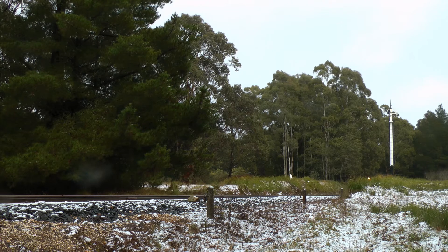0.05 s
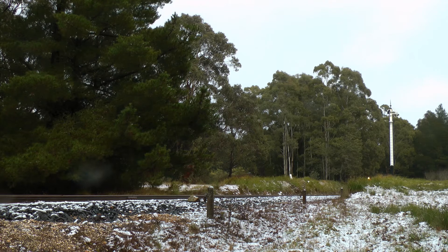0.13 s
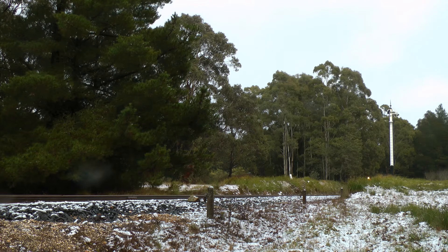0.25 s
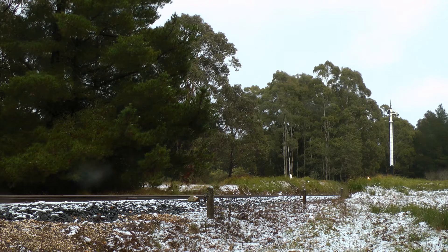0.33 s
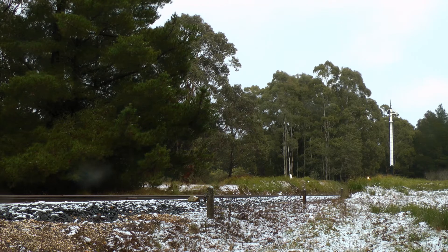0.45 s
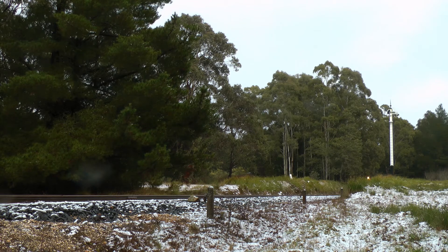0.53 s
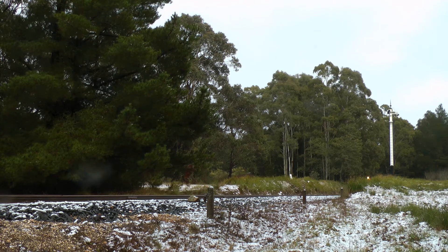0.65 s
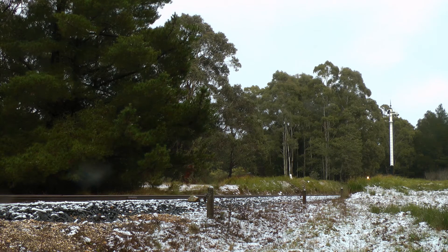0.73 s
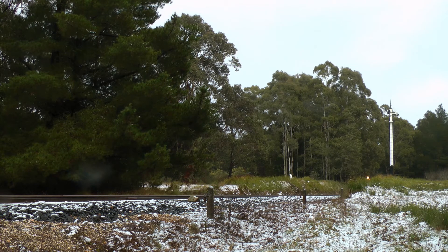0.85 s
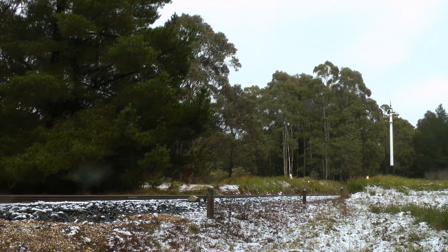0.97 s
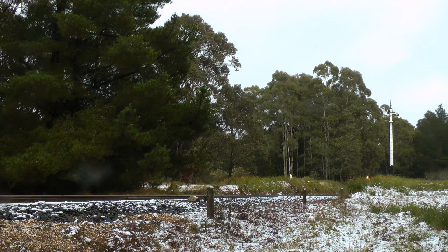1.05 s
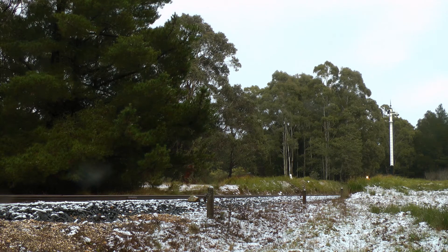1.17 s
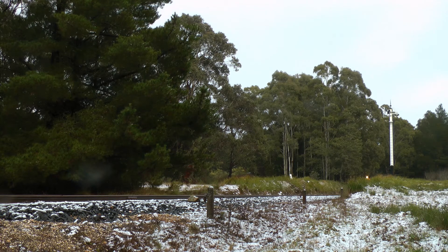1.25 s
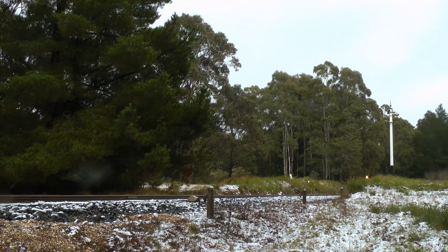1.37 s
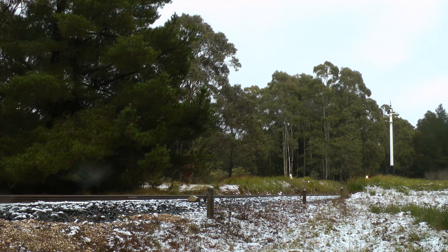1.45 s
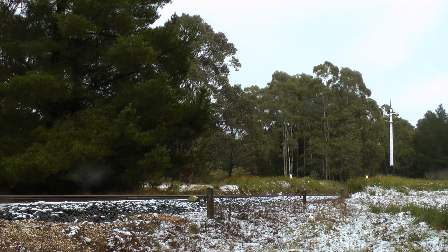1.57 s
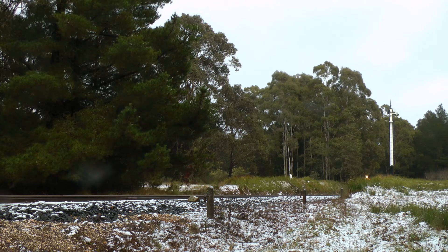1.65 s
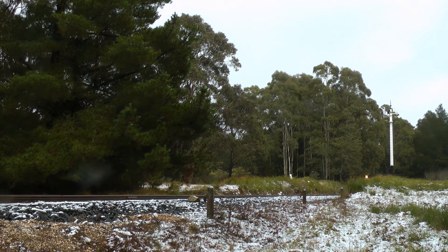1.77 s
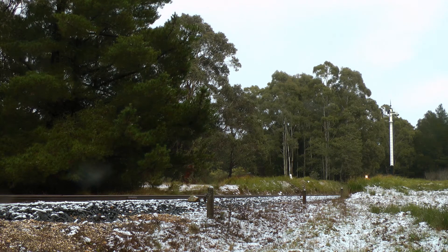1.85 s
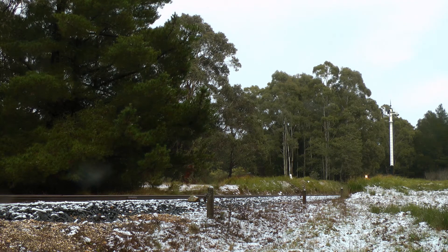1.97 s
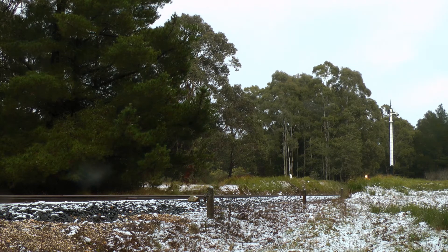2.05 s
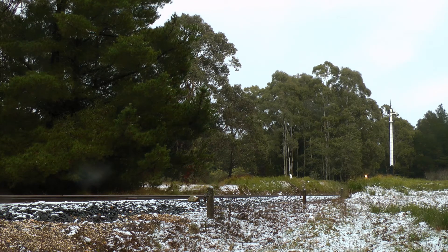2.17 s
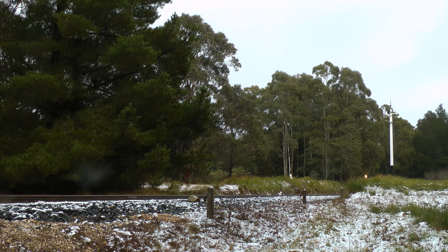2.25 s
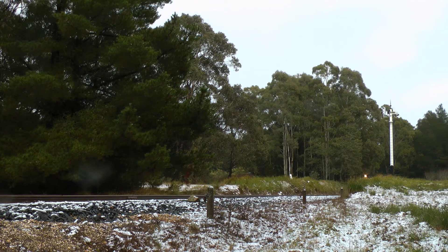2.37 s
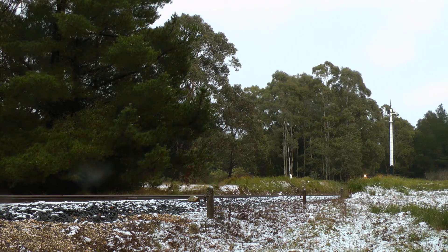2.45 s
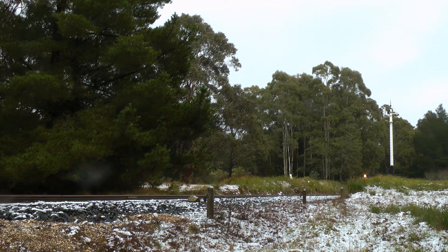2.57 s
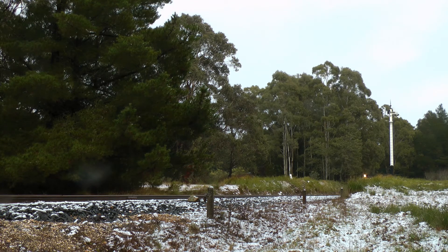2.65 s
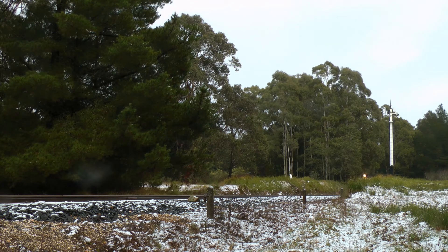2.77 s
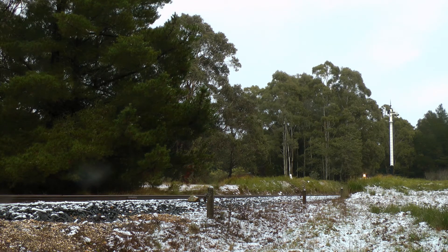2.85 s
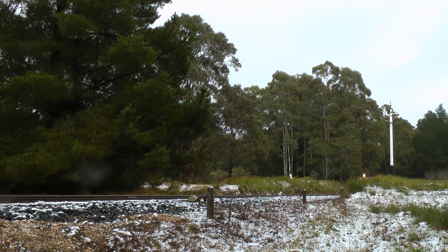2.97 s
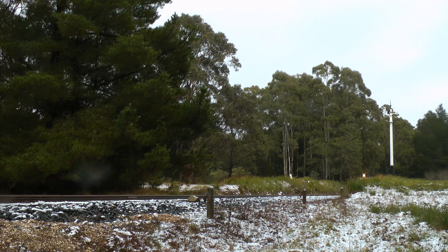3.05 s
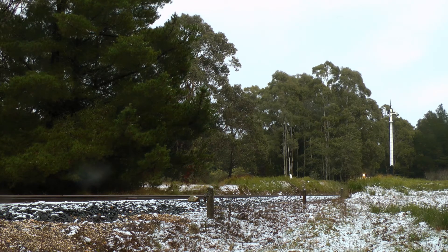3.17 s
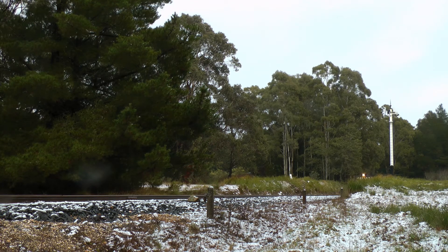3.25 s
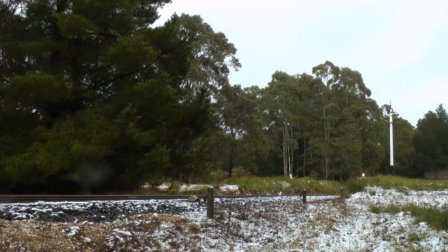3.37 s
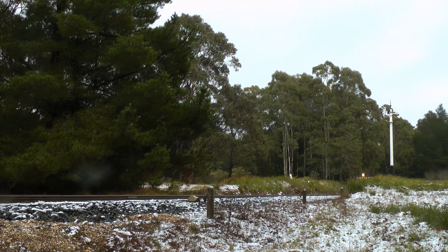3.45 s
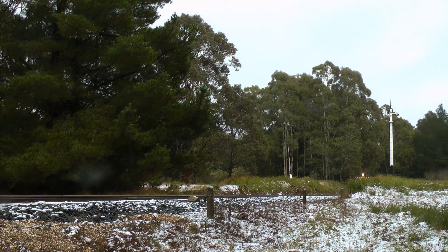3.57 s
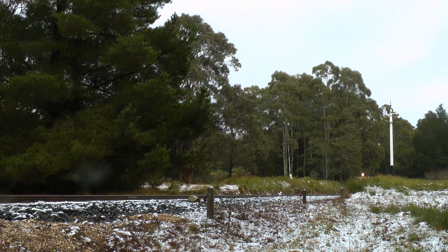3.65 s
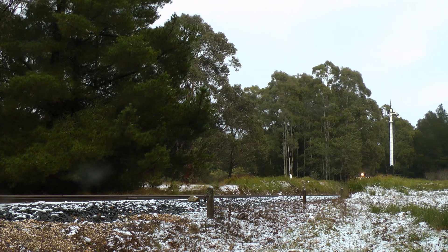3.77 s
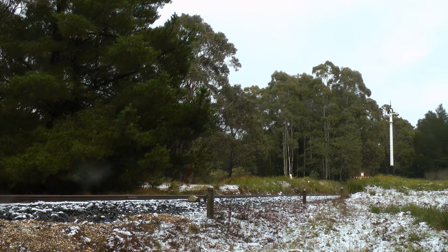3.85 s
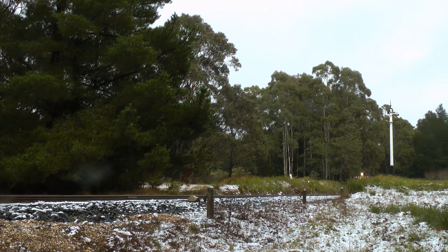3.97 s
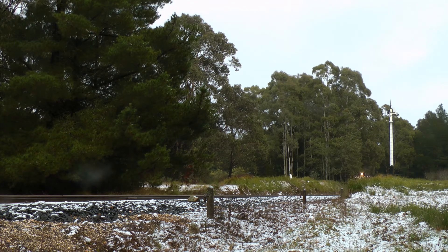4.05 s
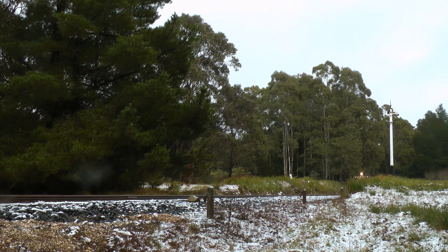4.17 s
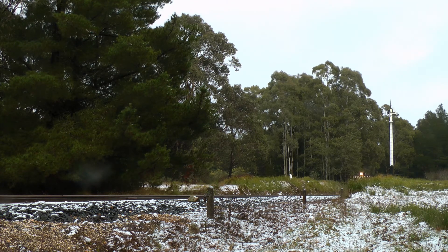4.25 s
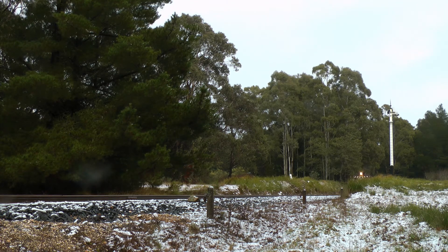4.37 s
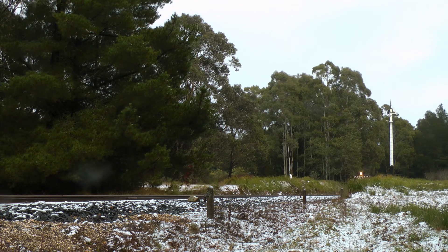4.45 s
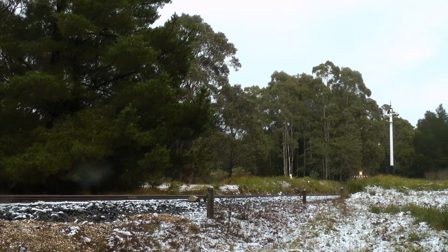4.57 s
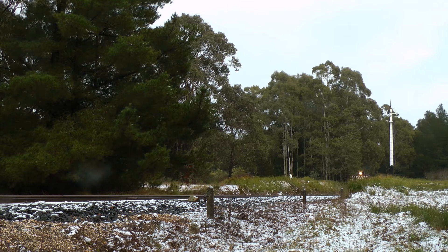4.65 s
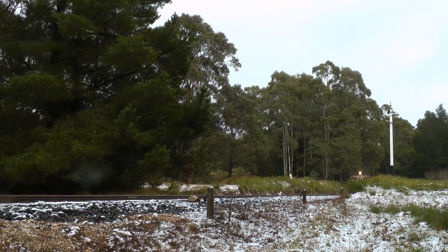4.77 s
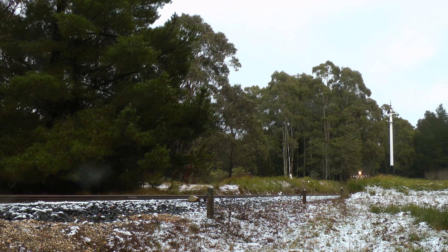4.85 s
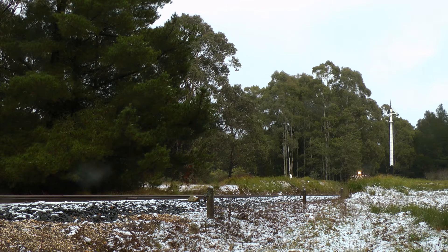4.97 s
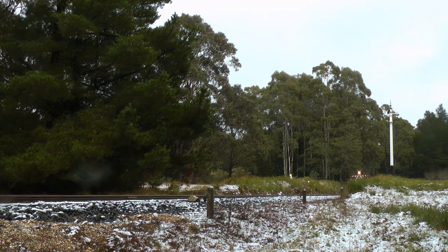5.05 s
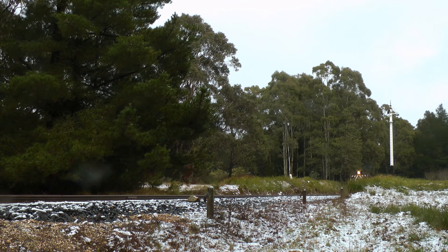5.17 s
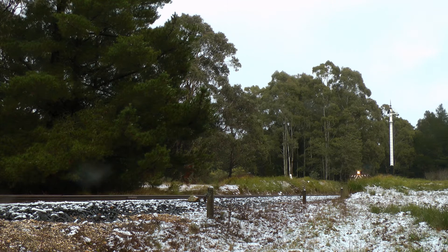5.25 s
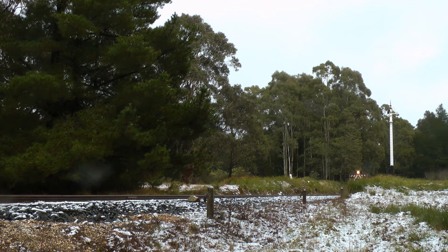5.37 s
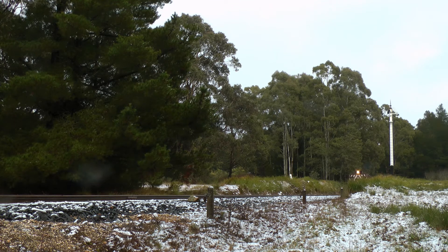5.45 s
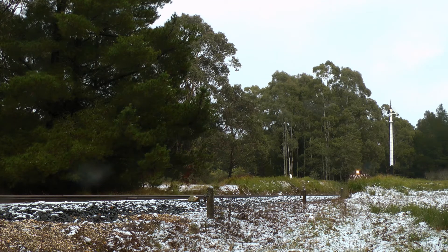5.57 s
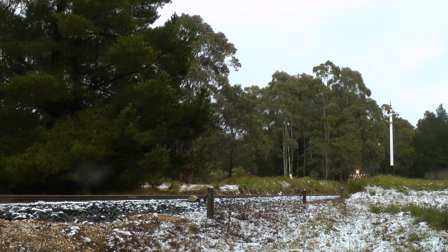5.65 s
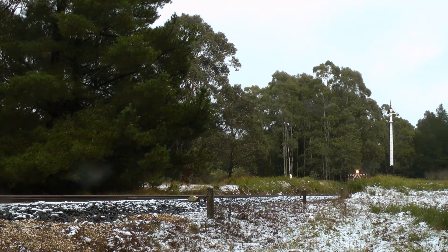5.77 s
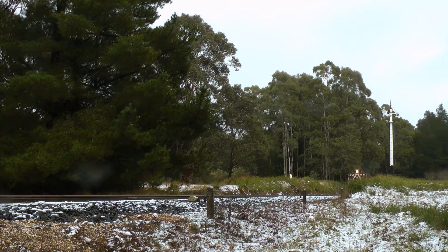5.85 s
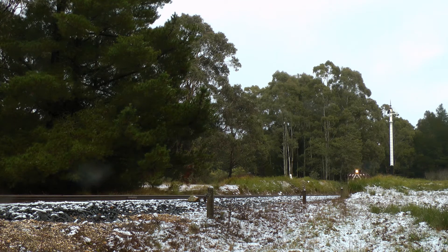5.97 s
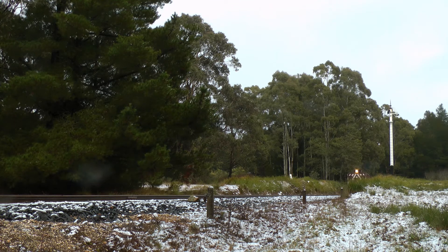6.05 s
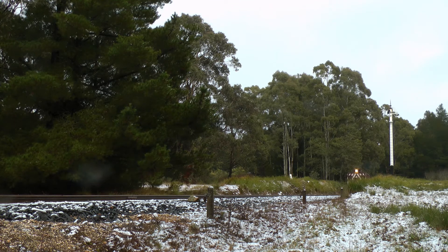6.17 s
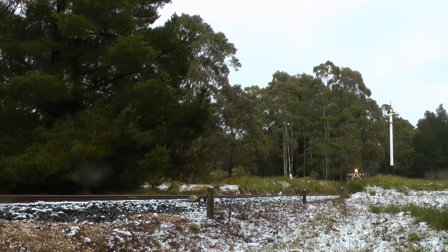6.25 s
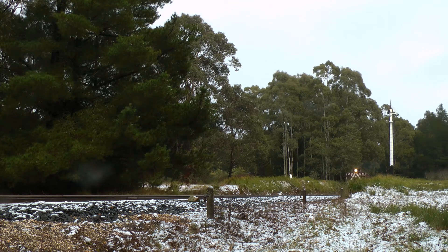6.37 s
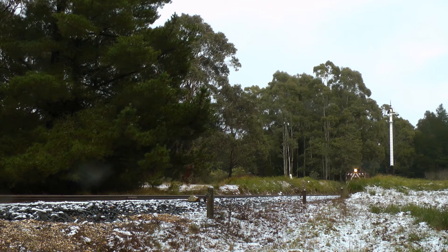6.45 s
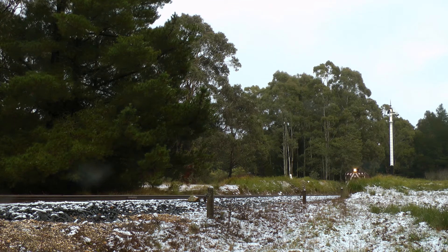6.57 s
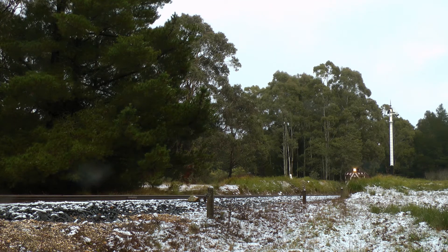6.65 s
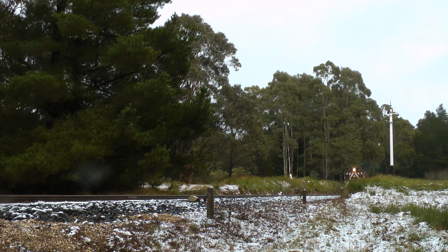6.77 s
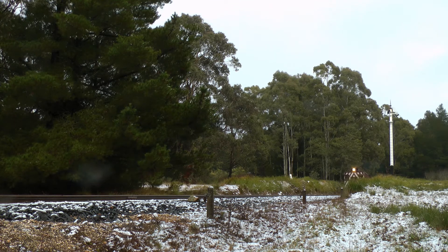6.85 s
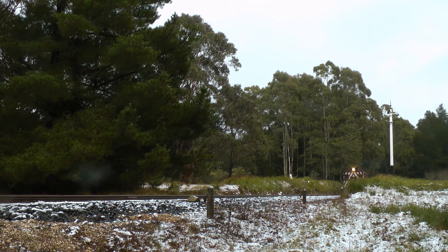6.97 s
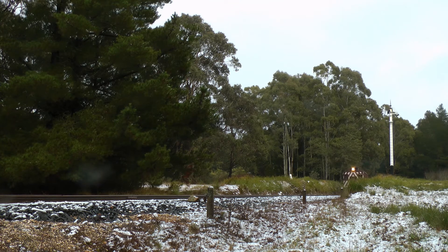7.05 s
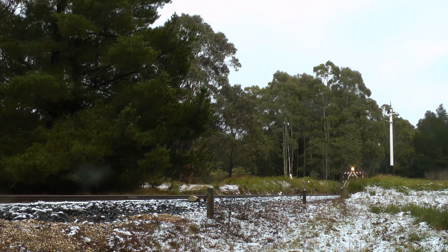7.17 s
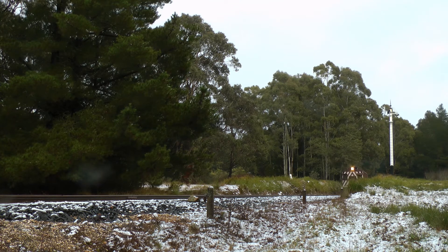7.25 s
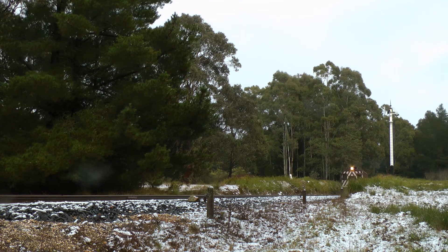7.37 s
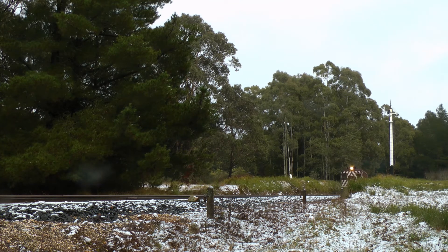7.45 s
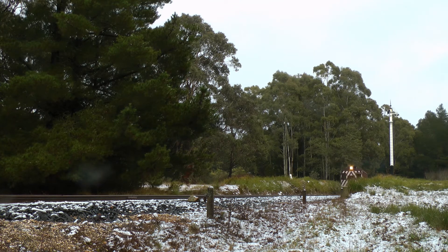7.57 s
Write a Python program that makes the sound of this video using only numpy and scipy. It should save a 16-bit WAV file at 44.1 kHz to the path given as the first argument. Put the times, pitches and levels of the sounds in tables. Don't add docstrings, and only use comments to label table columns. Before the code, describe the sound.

A distant diesel railcar is already audible at 0 s, approaching a fixed microphone across open ground. A steady low drone near 130 Hz leads, at nearly constant revs, rising quickly in the first second and then gradually to its fullest around 6.6 s, easing very slightly at the end. A weaker second drone, just lower, makes it waver and beat. Exhaust throb, hollow bark and dull block knocks surge in uneven gusts, clearer after about 3 s as the trees thin and strongest near 6-7.6 s. Beneath are a faint, slowly rising gear hum, rolling rumble and mid-range wheel and gas roar; above, soft fan hiss drifts, brighter around 2-3 s and at the end. Small thuds or clacks mark rail joints near 0.4, 2, 2.3, 4.6, 5.4, 6.3 and 7.1 s. Everything comes from one distant mono point, and the car has not passed by 7.6 s.

```python
import sys
import numpy as np
from scipy import signal
from scipy.fft import rfft, irfft, next_fast_len
from scipy.io import wavfile
from scipy.ndimage import uniform_filter1d, map_coordinates

SR = 44100
rng = np.random.default_rng(int(sys.argv[2]) if len(sys.argv) > 2 else 0)


def unload_audio(sound):
    columns = np.transpose(np.atleast_2d(sound))
    steps = np.round(np.clip(columns, -1, 1) * 32767)
    wavfile.write(sys.argv[1], SR, steps.astype(np.int16))


def level_to_linear(level):
    exponent = np.asarray(level, float) / 20
    return 10 ** exponent


N = 335601
T = np.arange(N) / SR

# time in seconds, level in dB.
DRONE_LEVEL = [(0, -26.5), (.6, -24), (1.2, -23), (1.8, -22.5), (2.4, -22), (3, -21.5), (3.6, -20.5),
               (4.2, -20.5), (4.8, -19), (5.4, -19), (6, -19), (6.6, -18), (7.2, -18.5), (7.61, -20)]
# time in seconds, lift in dB.
AIR_CARRY = [(0, -1.5), (1.1, -0.5), (2.3, 2), (3, 1.5), (4.1, 0.2), (4.6, -1.5), (5.3, -1.5), (5.85, 0.2),
             (6.2, -1.5), (7.1, 0.5), (7.61, 2)]


def unit(x):
    return x / np.sqrt(np.mean(x ** 2) + 1e-20)


def curves(rows):
    s, *cols = np.transpose(rows)
    return [np.interp(T, s, c) for c in cols]


def swells(rows, length=None):
    rows = np.array(rows, float)
    if length is None:
        width, lifts = np.abs(rows[:, 1]) + .01, rows[:, 2:].T
    else:
        width, lifts = np.full(len(rows), length + .01), rows[:, 1:].T
    coarse = np.arange(0, N + 64, 64) / SR
    bells = np.exp(-((coarse - rows[:, :1]) / width[:, None]) ** 2)
    return [np.interp(T, coarse, lift @ bells) for lift in lifts]


def wobble(rate):
    coarse = np.arange(0, N + 64, 64) / SR
    knots = rng.standard_normal(int(N * rate / SR) + 4)
    return np.interp(T, coarse, map_coordinates(knots, [coarse * rate]))


def nearing(mid_db, gain):
    drone_mid_db = -21
    return mid_db + gain * (curves(DRONE_LEVEL)[0] - drone_mid_db)


def clear_of_trees():
    return np.clip((T - 2.5) / 3.2, 0, 1)


def filtered(x, response):
    m = next_fast_len(N + SR // 2)
    return irfft(rfft(x, m) * response(np.fft.rfftfreq(m, 1 / SR)), m)[:N]


def patchy(x, depth_db, bins, frames):
    z = signal.stft(x, nperseg=1024)[2]
    field = uniform_filter1d(rng.standard_normal(z.shape), max(1, int(bins)), axis=0)
    field = uniform_filter1d(field, max(1, int(frames)), axis=1)
    return unit(signal.istft(z * level_to_linear(depth_db * unit(field)), nperseg=1024)[1][:N])


def noise(spectrum):
    f, db = np.transpose(spectrum)
    gain = lambda hz: level_to_linear(np.interp(np.log(hz + 1), np.log(f), db, left=-120, right=-120))
    return unit(filtered(rng.standard_normal(N), gain))


def modes(table):
    one = lambda f, c, w: 1j * f * w / (c * c - f * f + 1j * f * w)
    return lambda f: sum((-1) ** k * level_to_linear(db) * one(f, c, w) ** 2 for k, (c, w, db) in enumerate(table))


def echoed(f):
    # delay in seconds, level in dB.
    echoes = [
        (.0037, -13),
        (.00836, -8),
        (.0152, -14),
    ]
    return 1 + sum(level_to_linear(db) * np.exp(-2j * np.pi * f * s) for s, db in echoes)


def firings(turns, sizes_db, scatter_db, lope):
    # time in seconds, length in seconds, odd over even turns in dB.
    lopes = [
        (5.7, .3, 4),
    ]
    count = np.floor(6 * turns).astype(int)
    at = np.flatnonzero(np.diff(count)) + 1
    k = count[at]
    odd = (k // 6 % 2 - .5) * swells(lopes)[0][at]
    x = np.zeros(N)
    x[at] = level_to_linear(np.array(sizes_db)[k % 6] + lope * odd + scatter_db * rng.standard_normal(len(k)))
    return x


def firing_drone(turns):
    # multiple of the turn rate, dB under the drone, sign.
    low_orders = [(2, -45.5, 1), (3, -26.5, -1), (4, -29, 1), (5, -23, -1), (7, -17, -1), (8, -27, 1),
                  (9, -21, 1), (10, -42, 1), (12, -42.5, -1), (13, -45.5, -1)]
    angle, near = 2 * np.pi * turns, clear_of_trees()
    low = level_to_linear(.4 * wobble(6)) * np.cos(6 * angle)
    for k, db, sign in low_orders:
        level_db = db + 1.6 * wobble(3) + 6 * (k > 11) * near
        low += sign * level_to_linear(level_db) * np.cos(k * angle + .3 * wobble(3))
    return np.sqrt(2) * level_to_linear(curves(DRONE_LEVEL)[0]) * low


def silencer(turns):
    # multiple of the turn rate, level in dB.
    throb_orders = [(16, -27.5), (17, -21.5), (18, -15.5), (19, -19.5), (20, -4.5), (21, 1.5), (23, -23.5),
                    (24, -20)]
    # time in seconds, length in seconds, throb lift in dB, top order lift in dB.
    gusts = [(0, 0.46, 10, 13.5), (.44, 0.082, -2.5, 8.5), (.7, .15, 1, -2), (.95, 0.29, 6, 10),
             (1.5, 0.19, 4, 3), (1.91, 0.095, 9.5, 5), (2.56, .2, 6.5, -4.5), (2.96, 0.26, 4.5, -5),
             (4.15, .2, 2, 7.5), (4.55, .15, 8.5, 1), (4.96, 0.25, 2.5, 11.5), (5.32, 0.17, 4, 5),
             (5.75, .25, 5, 8), (6.4, .3, 10.5, 6), (7, 0.42, 12, 12), (7.61, 0.33, 12, 13)]
    angle = 2 * np.pi * turns
    drift = 1.3 - 1.1 * clear_of_trees() ** 2

    def lag(k):
        fixed_lag = .2 + .7 * (k % 2) - 1.3 * (k < 19.5) + 1.5 * (int(k == 23) - int(k == 19))
        return fixed_lag + drift * wobble(2)

    throb = sum(level_to_linear(db + 1.2 * wobble(2.1)) * np.cos(k * angle - lag(k)) for k, db in throb_orders)
    top = np.sqrt(2) * np.cos(22 * angle - lag(22))
    throb_lift, top_lift = swells(gusts)
    throb_db = nearing(-40, .6) + throb_lift - 1.4
    top_db = nearing(-45.5, 2) + top_lift + 0.8
    return level_to_linear(throb_db) * unit(throb) + level_to_linear(top_db) * top


def pipe_and_block(turns):
    # centre in Hz, width in Hz, level in dB.
    pipe = [(955, 32, -1), (1002, 30, 0), (1085, 34, -9), (1135, 34, -7), (1200, 30, -10), (1265, 45, -9)]
    low_pipe = [(674, 50, 0), (725, 40, -10), (848, 34, 0)]
    block = [(1590, 130, 0), (1810, 160, -4), (2120, 170, -7)]
    bark_cylinders = [0, -28, -20, -8, -15, -22]
    knock_cylinders = [0, -20, -14, -10, -22, -14]
    # time in seconds, length in seconds, lifts of bark, low bark and knock in dB.
    gusts = [(.2, .08, 1, 5, 6), (.45, .12, 10, 7.5, 8.5), (.83, 0.097, -5.5, 6, 3), (1.29, .1, 5.5, 1, 3),
             (1.48, .08, -6, 10.5, 4), (1.9, .45, 4.5, -4, -3), (2.6, 0.34, 2, 4, 4),
             (3.25, .1, 5.5, 7.5, -2.5), (3.45, .2, 11, 1.5, 2.5), (4.1, 0.37, -6, 5, -1),
             (4.95, 0.29, 7, -1.5, 0.5), (5.19, .07, 5.5, 1, 0.5), (5.42, .12, 9, 3.5, 4.5),
             (5.9, 0.28, 10, 4.5, 8), (6.3, 0.17, 7.5, 3.5, 2), (6.8, 0.36, 7.5, -6.5, 2),
             (7.3, .2, 11.5, 2.5, 0.5), (7.61, 0.23, 12, 7.5, 6.5)]
    near = clear_of_trees()
    blows = filtered(firings(turns + .14, bark_cylinders, scatter_db=1, lope=.2), echoed)
    strikes = firings(turns + .06, knock_cylinders, scatter_db=1.3, lope=.6)
    bark = patchy(filtered(blows, modes(pipe)), depth_db=2, bins=1, frames=50)
    low_bark = patchy(filtered(blows, modes(low_pipe)), depth_db=2.5, bins=1, frames=40)
    knock = patchy(filtered(strikes, modes(block)), depth_db=2, bins=6, frames=20)
    bark_lift, low_bark_lift, knock_lift = swells(gusts)
    bark_db = nearing(-45, 0.48) + bark_lift - 2.4 + 1.0 * near
    low_bark_db = nearing(-40.5, .2) + low_bark_lift - 7.0 + 5.3 * near
    knock_db = nearing(-42, .6) + knock_lift - 11.5 + 5.5 * near
    return level_to_linear(bark_db) * bark + level_to_linear(low_bark_db) * low_bark + level_to_linear(knock_db) * knock


def second_drone(turns):
    # time in seconds, cycles behind.
    slip = [(0, -.5), (.34, 1), (.7, 2), (1.53, 5), (1.76, 6), (2.36, 9), (2.61, 10), (2.83, 11),
            (3.18, 13), (3.59, 15), (4.43, 20), (5.52, 26), (5.91, 28), (6.14, 29), (6.55, 31), (7.26, 35),
            (7.4, 36), (7.61, 37.1)]
    # time in seconds, lift in dB.
    come_through = [(.12, 9), (.36, 5), (.68, 5), (.99, 18), (1.27, 7), (1.52, 7.5), (1.75, 13),
                    (2.22, 6.5), (2.6, 19), (2.83, 15), (3.15, 5), (3.4, 15), (3.95, 2.5), (4.62, 4.5),
                    (5.15, 12), (5.52, 14.5), (5.75, 9), (6.1, 11), (6.6, 5), (6.92, 14)]
    level_db = -47 + swells(come_through, length=0.14)[0]
    return -np.sqrt(2) * level_to_linear(level_db) * np.cos(2 * np.pi * (6 * turns - curves(slip)[0]))


def gears():
    # pitch at the start in Hz, rise in Hz a second, level in dB.
    meshes = [
        (176.4, 1.55, -37.5),
        (158.7, 1.7, -45.5),
    ]
    # pitch in Hz, level in dB, time the fade starts in seconds.
    body_panels = [
        (375.7, -50, 4.6),
        (424, -49, 4),
        (388.5, -50, 11),
    ]

    def hum(hz, level_db, sway):
        phase = 2 * np.pi * np.cumsum(hz) / SR + sway * wobble(4)
        return level_to_linear(level_db + 3.6 * wobble(3.3)) * np.sin(phase)

    total = np.zeros(N)
    for hz, db, end in body_panels:
        fade_db = 12 * np.clip(T - end, 0, 2)
        total += hum(hz + 0 * T, db + 1.0 - fade_db, sway=0.94)
    for hz, rise, db in meshes:
        total += hum(hz + rise * T, db, sway=0.4)
    return total


def rolling(turns):
    # frequency in Hz, level in dB.
    ground_colour = [(12, -34), (26, -16), (40, -2.5), (55, -3), (70, -21)]
    rumble_colour = [(45, -31), (60, -5.5), (75, -2.5), (95, -1.5), (120, 0), (150, -2), (190, -4.5),
                     (215, -20), (240, -43)]
    roar_colour = [(170, -32), (215, -10), (300, -16.5), (400, -5), (455, 2.5), (500, -10), (600, -9),
                   (670, -5), (760, -6.5), (840, -1), (900, -5.5), (980, -1), (1350, -13.5), (1700, -36)]
    clank_colour = [(760, -34), (1300, 3), (2300, -2), (2600, -13.5), (3380, -38.5), (5720, -120)]
    # time in seconds, ground lift in dB, rumble lift in dB.
    jolts = [(0, 9, 11), (.43, 5, 13), (.7, -2, 7.5), (2.35, 3.5, 3.3), (2.82, 6.5, 3), (3.4, 7.5, 5),
             (3.66, 9, 14), (3.95, 15, 9.5), (4.16, 4, 13), (4.37, 7.5, 6.5), (4.68, 7, 10.5),
             (4.95, 3, 10.5), (5.28, 2, 4.5), (5.53, 3, 4), (5.87, 0, 7.5), (6.19, 1.5, 6), (6.45, -5, 7.5),
             (6.77, 1, 9), (7.05, 3, 7), (7.3, 0.1, 5), (7.55, 6, 5)]
    # time in seconds, length in seconds, lift in dB.
    roar_swells = [
        (4.1, .1, -2),
        (4.98, .1, 0),
        (6.8, 0.22, -2.5),
        (7.45, 0.31, 4.5),
    ]
    ground_lift, rumble_lift = swells(jolts, length=.1)
    ground_db = nearing(-56, .1) + ground_lift - 1.0
    rumble_db = nearing(-48, 0.66) + rumble_lift + 5.0
    roar_db = nearing(-39, .7) + swells(roar_swells)[0] + 6.0 - 2.3 * np.clip((T - 3.5) / 2, 0, 1)
    clank_db = nearing(-39.5, .15) + 0.76 * curves(AIR_CARRY)[0] + 0.5
    puff = np.cos(2 * np.pi * turns)
    rumble = patchy(noise(rumble_colour), depth_db=2.5, bins=2.5, frames=5.5)
    roar = patchy(noise(roar_colour) * level_to_linear(0.081 * puff), depth_db=1.13, bins=8, frames=12)
    clank = patchy(noise(clank_colour) * level_to_linear(0.14 * puff), depth_db=1.0, bins=4.7, frames=11)
    low = level_to_linear(ground_db) * noise(ground_colour) + level_to_linear(rumble_db) * rumble
    return low + level_to_linear(roar_db) * roar + level_to_linear(clank_db) * clank


def fan():
    # frequency in Hz, level in dB.
    hiss_colour = [(1800, -28.5), (2500, 0.5), (2700, -2), (3440, 0.5), (4000, -9), (4830, -19.5),
                   (5600, -25.5), (6300, -43.5), (7000, -73)]
    edge_colour = [(4500, -23.5), (5600, -4.5), (6300, -4), (7200, -12.5), (8500, -29)]
    carry_db, = curves(AIR_CARRY)
    hiss = patchy(noise(hiss_colour), depth_db=0.65, bins=41, frames=5.5)
    edge = patchy(noise(edge_colour), depth_db=1.5, bins=25, frames=12)
    return level_to_linear(-45 + carry_db + 0.1) * hiss + level_to_linear(-79 + 2.2 * carry_db) * edge


def joints():
    # time in seconds, clack level in dB, thud level in dB, thud pitch in Hz, length in seconds.
    rail_joints = [(0.192, -61, -30, 290, 0.0084), (0.345, -75, -40, 280, 0.015),
                   (0.384, -43, -48, 100.6, .1), (1.4, -65, -40, 280, .015), (1.968, -44, -43, 196, 0.081),
                   (2.058, -58, -42, 261, .025), (2.329, -55.5, -29.5, 240, 0.026),
                   (3.665, -60, -30, 110, .02), (4.597, -38.5, -60, 250, 0.05),
                   (4.663, -41, -41, 262, 0.016), (5.446, -43.5, -49, 203, .05),
                   (6.283, -44.5, -49, 250, 0.049), (6.428, -46, -36, 100, 0.034),
                   (6.867, -57, -41, 260, 0.014), (7.115, -38, -50, 202, .04)]
    # frequency in Hz, level in dB.
    clack_colour = [(1500, -27), (2500, 3.5), (3500, -0.5), (4300, -13.5), (5500, -19), (6500, -42)]
    thuds, gate = np.zeros(N + SR), np.zeros(N + SR)
    t = np.arange(SR // 4) / SR
    for s, clack_db, thud_db, hz, length in rail_joints:
        start = round(s * SR)
        rise = t / length * 4
        shape = rise * np.exp(1 - rise)
        thuds[start:][:len(t)] += level_to_linear(thud_db) * shape * np.sin(2 * np.pi * hz * t)
        clack = np.exp(-(t / length) ** 2) * (1 - np.exp(-t / 0.0074))
        gate[start:][:len(t)] += level_to_linear(clack_db) * clack
    return thuds[:N] + gate[:N] * noise(clack_colour)


def scene():
    # time in seconds, lead in degrees.
    lead = [(0, -23), (1.2, -33.8), (1.8, -38), (2.4, -40), (3, -37.3), (3.6, -33.1), (4.2, -31.1),
            (4.8, -30.5), (6, -33.5), (6.6, -32.9), (7.61, -28.5)]
    turns_hz = 130.45 / 6
    turns = turns_hz * T + curves(lead)[0] / 360
    engine = firing_drone(turns) + silencer(turns) + pipe_and_block(turns)
    return (engine + second_drone(turns) + gears() + rolling(turns) + fan() + joints())[None]


def band_limit(x):
    return signal.sosfilt(signal.butter(12, 15720, fs=SR, output="sos"), x)


def record(dry):
    # frequency in Hz, level in dB.
    self_noise = [(20, 0), (8000, 0), (12000, -.5), (15000, -1), (20000, -2)]
    mix = dry + level_to_linear(-78.5) * noise(self_noise)
    return band_limit(mix)


dry = scene()
out = record(dry)
unload_audio(out)
```